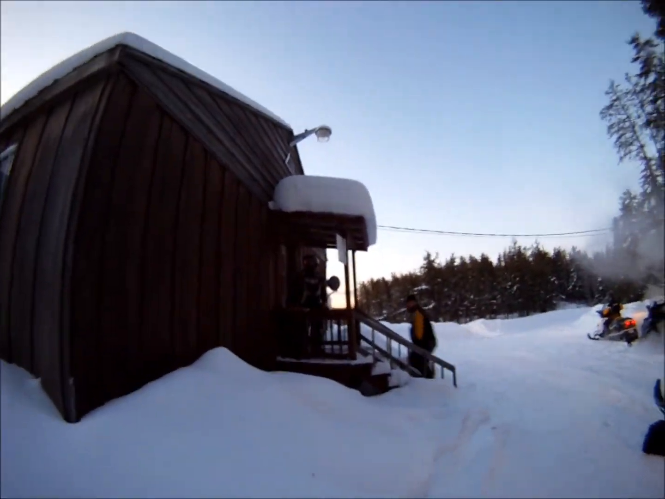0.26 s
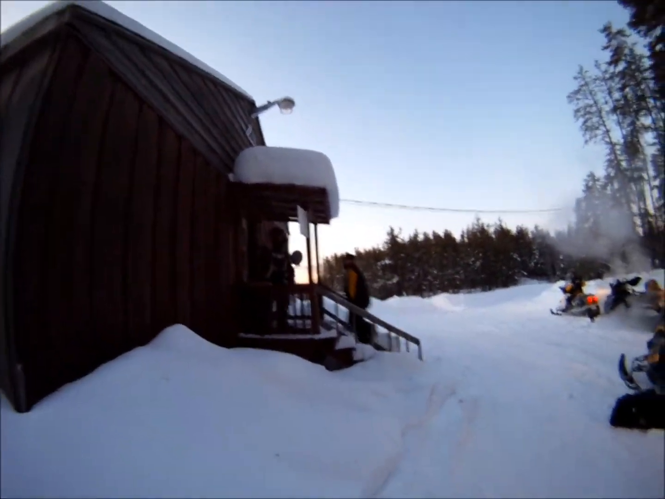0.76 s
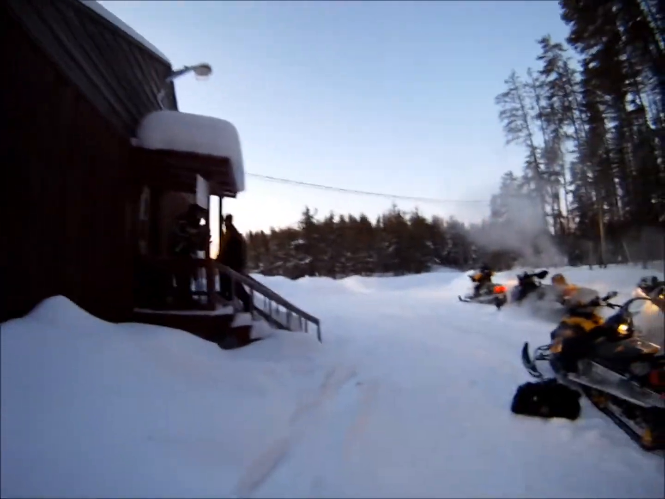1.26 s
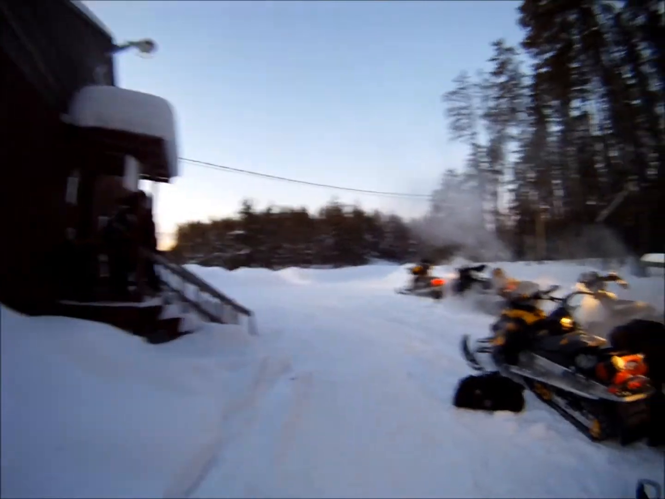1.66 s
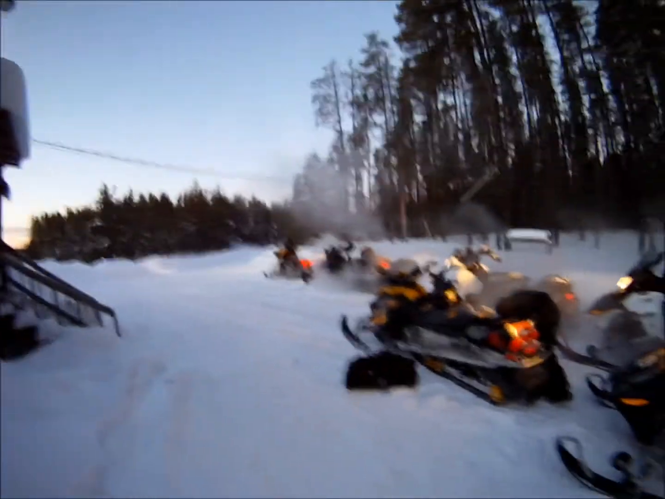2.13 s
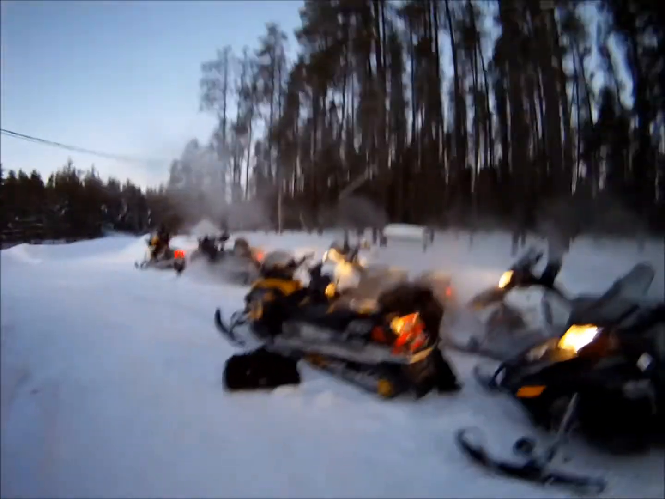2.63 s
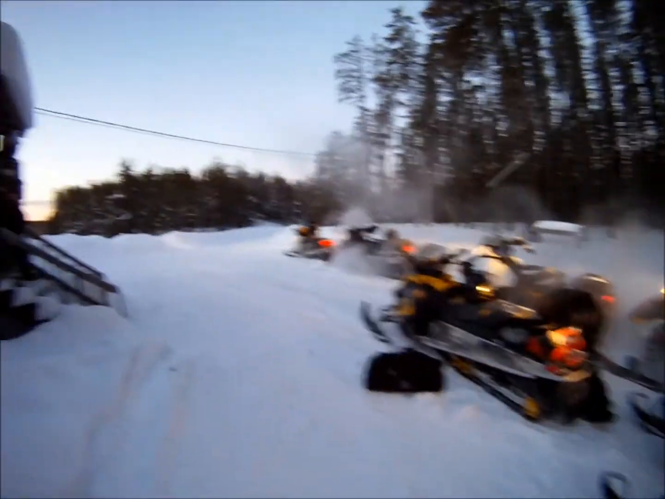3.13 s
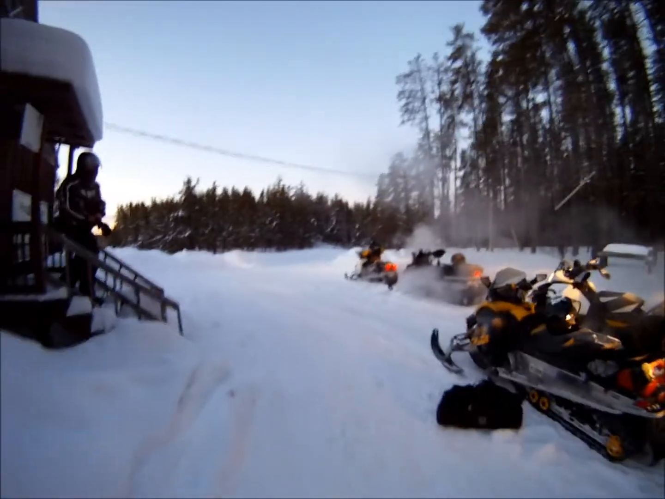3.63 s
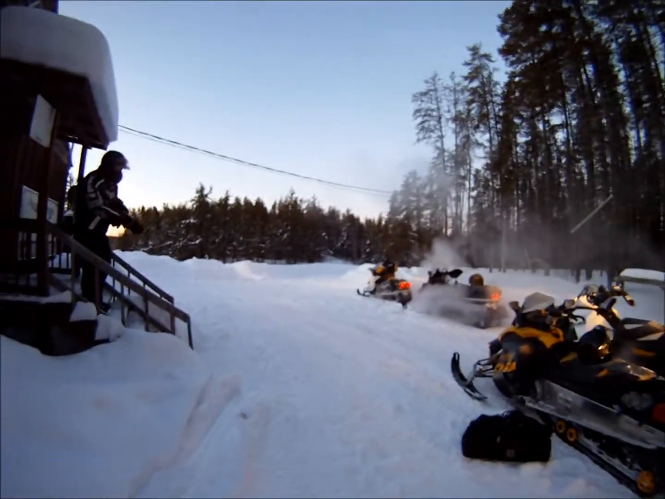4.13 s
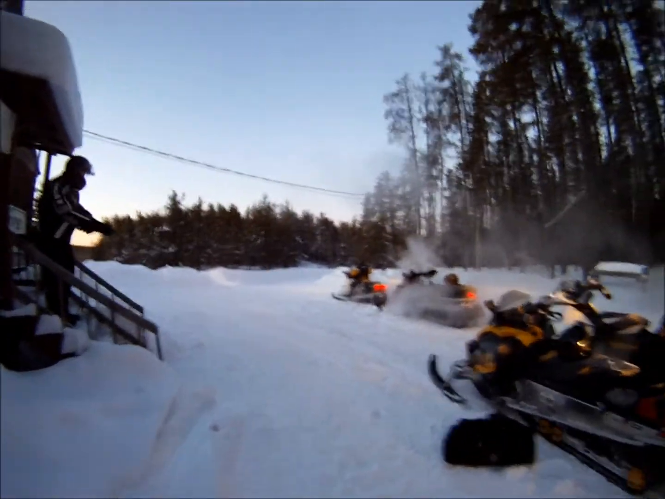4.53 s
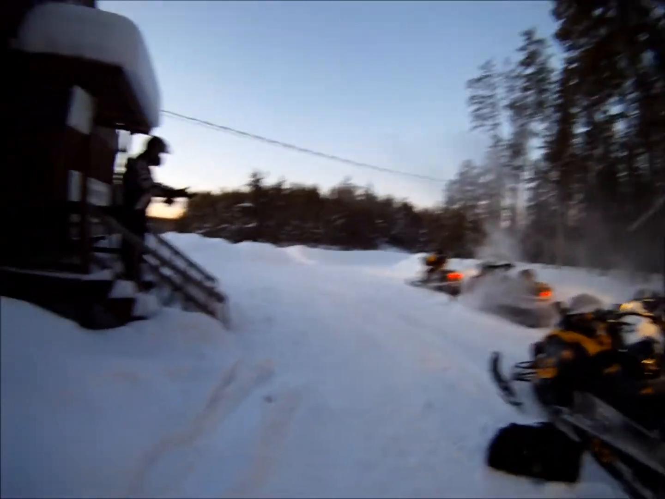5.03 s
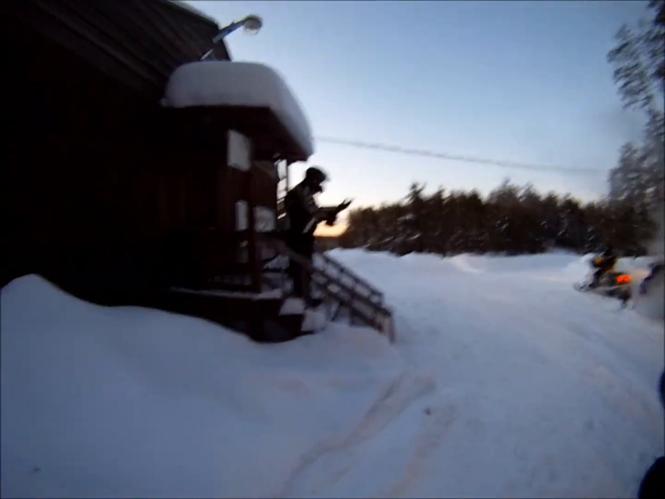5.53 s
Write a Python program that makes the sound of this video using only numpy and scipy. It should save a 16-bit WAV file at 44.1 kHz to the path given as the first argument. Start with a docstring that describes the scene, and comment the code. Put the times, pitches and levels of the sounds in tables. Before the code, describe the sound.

Close clicks and dull bumps from a handheld plastic camera case sit over the steady, fairly quiet rattle and hum of idling snowmobiles. A rough scrape with one very loud, sharp knock breaks in around two seconds and trails off in shorter rubs. The engines keep idling in the dry outdoor air, a far one gently opens its throttle, and a quick cluster of thuds and clicks comes at the end.

```python
"""Idling snowmobiles, handled camera

Several snowmobiles idle on open snow, heard from a camera in a plastic case carried past them.
Their exhausts beat against each other under a throbbing clatter; a far one creeps off.
Something scrapes over the case and knocks it once sharply; handling makes it click and thud."""
import sys
import numpy as np
from scipy import signal
from scipy.fft import rfft, irfft
from scipy.io import wavfile
from scipy.ndimage import uniform_filter1d

SR = 44100
rng = np.random.default_rng(int(sys.argv[2]) if len(sys.argv) > 2 else 0)


def store_pcm(level_fs):
    """Save levels as 16-bit WAV."""
    pcm = np.round(np.clip(level_fs, -1, 1) * 32767).astype(np.int16)
    wavfile.write(sys.argv[1], SR, np.atleast_2d(pcm).T)


N = 254898


def snowmobiles():
    """Idling exhausts beat against each other over their joint clatter."""
    # Each row: firing rate in Hz, exhaust level in dB, rattle in dB relative to the near engine's.
    other_idles = [(64.53, -47, -0.5), (73, -46, -2), (79.5, -47.5, -6.5)]
    exhausts, rattles = near_engine()
    for firing_hz, exhaust_db, rattle_db in other_idles:
        exhaust, metal = other_engine(firing_hz)
        exhausts = exhausts + undb(exhaust_db) * exhaust
        rattles = rattles + undb(rattle_db) * metal
    return exhausts + clatter(rattles)


def near_engine(waver_db=3.0, hunt=0.0083):
    """Twin with unequal cylinders: odd shaft multiples sound beside the firing rate."""
    # Each row: time in seconds, shaft rate in Hz.
    shaft_speed = [(0.0, 35.8), (0.26, 33.07), (0.45, 35.28), (1.0, 33.13), (1.33, 35.73), (1.59, 33.6),
                   (1.82, 34.83), (2.22, 33.2), (2.3, 34.4), (3.4, 34.5), (3.53, 33.3), (3.81, 34.8),
                   (5.68, 34.41), (5.78, 35.67)]
    # Each row: multiple of the shaft rate, exhaust level in dB.
    harmonics = [(1, -55), (2, -45.5), (3, -46), (4, -54.5), (5, -61), (6, -63), (7, -72)]
    turns = np.cumsum(curve(shaft_speed) * (1 + hunt * walk(14))) / SR
    exhaust = np.zeros(N)
    for multiple, db in harmonics:
        amplitude = np.sqrt(2) * undb(db + waver_db * walk(22))
        exhaust += amplitude * np.sin(2 * np.pi * (multiple * turns + rng.random()))
    return exhaust, rattle(2 * turns, decay_cycles=0.31, depth=1.1)


def other_engine(firing_hz, hunt=0.025, scatter_db=2.5):
    """Unsteady idle: uneven firings ring the silencer and rattle the metal."""
    # Each row: frequency in Hz, gain in dB.
    silencer = [(10, -9), (22, -20), (48, -7), (70, 0.5), (100, 2.5), (125, -11), (200, -14), (260, -22.5),
                (400, -39), (900, -46)]
    cycles = rng.random() + np.cumsum(firing_hz * (1 + hunt * walk(7))) / SR
    at = np.flatnonzero(np.diff(np.floor(cycles)))
    firings = impulses(at, undb(scatter_db * rng.standard_normal(N)[:len(at)]))
    exhaust = unit(colour(firings - firings.mean(), silencer))
    return exhaust, rattle(cycles, decay_cycles=0.27, depth=0.95)


def rattle(cycles, decay_cycles, depth):
    """Metal noise flares at each firing and fades within the cycle."""
    flare = 1 + depth * np.exp(-(cycles % 1) / decay_cycles)
    return unit(flare * rng.standard_normal(N))


def clatter(rattles, base_db=-45.5, throb_hz=14.0, throb_db=1.57, flutter_db=0.52):
    """Rattle rings block, clutch and covers, throbbing as the engine rocks on its mounts."""
    # Each row: frequency in Hz, gain in dB.
    block_and_clutch = [(250, -8), (420, -13), (560, -15.5), (720, -9), (1150, -3), (1340, -9.5),
                        (1500, -1.5), (1800, -0.5), (2400, -3), (2950, -12.5), (3400, -10), (4500, -17.5),
                        (5200, -13.5), (10000, -20.5), (15000, -17.5)]
    # Each row: frequency in Hz, width in Hz, lift in dB.
    cover_modes = [(1937, 31, 6.5), (2200, 28.5, 9), (2660, 46, 6.5), (3115, 63, 7.5), (3586, 60, 5),
                   (6530, 170, 6.5), (8470, 136, 9.5), (9760, 85, 8.5), (14200, 60, -3)]
    # The camera turns past the machines. Each row: time in seconds, half width in seconds, lift in dB.
    swells = [(1.25, .3, 1.2), (2.55, 0.35, 4), (5.6, 0.23, 3.5)]
    rocking_hz = throb_hz * (1 + 0.05 * walk(4))
    rocking = np.sin(2 * np.pi * np.cumsum(rocking_hz) / SR)
    drive = rattles * undb(throb_db * rocking + flutter_db * walk(25.054))
    ringing = unit(resonate(colour(drive, block_and_clutch), cover_modes))
    time_s = np.arange(N) / SR
    swell_db = sum(db * np.exp(-((time_s - at_s) / width_s) ** 2) for at_s, width_s, db in swells)
    return ringing * undb(base_db + swell_db)


def scrape(slips_per_s=2500, spread_db=1.0, grip_db=-0.5, thin_hz=1500, firm_db=-24):
    """Dense tiny slips and a few hard snags ring the shell as something drags over it."""
    # Each row: frequency in Hz, gain in dB.
    shell = [(60, -26), (200, -28), (400, -13), (600, -21), (720, -7.5), (850, -12), (1150, 1.5),
             (1330, -6.5), (1650, 4), (2050, -3), (2500, -12), (4000, -24.5), (15000, -21)]
    # Each row: frequency in Hz, width in Hz, lift in dB.
    shell_modes = [(1165, 27, 4.5), (1356, 22, 9.5), (1835, 42, 4), (2843, 126, 10.5), (3620, 134, 9.5),
                   (4370, 190, 7.5), (7500, 140, 5), (8330, 120, 8), (10750, 350, 7), (13300, 180, 10)]
    # Each row: time in seconds, level in dB, crack offset in dB.
    snags = [(2.0589, -2.5, -13), (2.0678, -5.5, -17), (2.0695, -6, -17), (2.1029, -7, -15),
             (2.1296, -17, -9), (2.1307, -4, -15), (2.1345, -6, -17), (2.357, -32, -10), (2.4788, -16, -11)]
    slipping = rng.random(N) < slips_per_s / SR
    slips = slipping * undb(spread_db * rng.standard_normal(N)) * rng.choice([-1, 1], N)
    slips *= undb(grip_db * walk(150))  # grip comes and goes
    full = unit(resonate(colour(slips, shell), shell_modes))
    thin = unit(signal.sosfiltfilt(signal.butter(1, thin_hz, "high", fs=SR, output="sos"), full))
    level_db = stroke_level_db()
    firmness = np.minimum(undb((level_db - firm_db) / 2), 1)  # a light touch stirs low modes less
    rasp = (firmness * full + (1 - firmness) * thin) * undb(level_db)
    at_s, snag_db, crack_db = np.transpose(snags)
    snag_rings = resonate(taps(np.c_[at_s, snag_db], shell), shell_modes)
    return rasp + snag_rings + cracks(at_s, snag_db + crack_db)


def stroke_level_db(press_db_per_s=42):
    """Each scraping stroke bites, presses harder while held, then dies away."""
    # Each row: start in seconds, 60 dB rise time in seconds, hold in seconds,
    # level at the start in dB, 60 dB release time in seconds.
    strokes = [(1.96, .08, .173, -25.5, 0.037), (2.18, .02, 0.025, -37.5, 0.32),
               (2.27, .16, .012, -27, 0.17), (2.339, .08, 0.019, -37, 0.12), (2.447, .02, .004, -30.5, .12),
               (2.479, .02, .008, -24.5, .13), (2.52, .1, .02, -36, .7), (2.984, .06, .01, -42, 0.16)]
    power = 1e-12
    for start_s, rise_s, hold_s, db, t60_s in strokes:
        age_s = np.arange(N) / SR - start_s
        held_db = db + press_db_per_s * np.clip(age_s, 0, hold_s)
        fade_db = 60 * (np.maximum(-age_s, 0) / rise_s + np.maximum(age_s - hold_s, 0) / t60_s)
        power = power + undb(held_db - fade_db) ** 2
    return 10 * np.log10(power)


def knock(crack_db=1.5):
    """A sharp knock on the case, ringing near 1.3 kHz with a harsh, clipped edge."""
    # Each row: time in seconds, level in dB.
    chatter = [(2.0402, -1), (2.04056, 2), (2.0409, -3)]
    # Each row: frequency in Hz, gain in dB.
    overloaded_knock = [(80, -13), (400, 5), (750, -9), (1250, 5), (1800, 5.5), (3000, -24), (4700, -5.5),
                        (6500, -11.5), (10000, -21), (15000, -18.5)]
    at_s, db = np.transpose(chatter)
    direction = (-1) ** np.arange(len(at_s))  # in, back, in again within a millisecond
    pushes = impulses(at_s * SR, direction * undb(db))
    return colour(pushes, overloaded_knock) + cracks(at_s, db + crack_db)


def clicks(width_hz=220, lift_db=5, snap_db=-17):
    """Each joint of the case snaps and rings briefly at its own pitch."""
    # Each row: time in seconds, level in dB, ring frequency in Hz.
    snaps = [(.031, -24.5, 1600), (0.952, -24, 1640), (1.131, -18, 1650), (1.1414, -18.5, 1120),
             (1.239, -16.5, 1450), (1.4343, -21.5, 1270), (2.9629, -30, 1710), (2.98, -27.5, 1690),
             (5.5807, -31, 1900), (5.6926, -22.5, 2250)]
    # Each row: frequency in Hz, gain in dB.
    joint = [(60, -22), (400, -20.5), (700, 3), (850, 1), (1150, 9), (1350, 3.5), (1620, 11.5), (2100, 5),
             (2800, -17), (5000, -19), (8500, -50), (10400, -4.5), (15000, -22)]
    rings = sum(resonate(taps([(at_s, db)], joint), [(hz, width_hz, lift_db)]) for at_s, db, hz in snaps)
    at_s, db, _ = np.transpose(snaps)
    return rings + cracks(at_s, db + snap_db, highpass_hz=9000)


def thuds(snap_db=-10):
    """Soft contacts move the whole case; each starts with a faint snap."""
    # Each row: time in seconds, level in dB.
    contacts = [(0.059, -32.5), (.294, -30), (0.953, -34.5), (1.056, -32), (1.142, -20.5), (1.436, -30.5),
                (1.826, -29.5), (1.923, -30.5), (1.956, -21), (2.133, -35), (2.357, -25.5), (2.891, -31),
                (3.2045, -29.5), (3.347, -32), (4.487, -34), (5.513, -18.5), (5.5777, -16.5),
                (5.6933, -14.5)]
    # Each row: frequency in Hz, gain in dB.
    case_body = [(30, -35), (130, 3.5), (220, 3.5), (400, 1), (560, -3), (730, 4.5), (860, -17), (1000, -4),
                 (1250, -11.5), (1800, -10), (3500, -22.5), (15000, -30)]
    at_s, db = np.transpose(contacts)
    return taps(contacts, case_body) + cracks(at_s, db + snap_db, highpass_hz=8000)


def cracks(at_s, db, highpass_hz=3000):
    """Bright first instant of a contact, before the case rings."""
    highpass = signal.butter(2, highpass_hz, "high", fs=SR, output="sos")
    return signal.sosfilt(highpass, impulses(at_s * SR, undb(db)))


def jolts(t60_s=0.076):
    """The jolted camera swings briefly in the hand."""
    # Each row: start in seconds, frequency in Hz, initial level in dB.
    swings = [(1.154, 32, -30), (1.958, 62, -22), (2.137, 53, -23), (5.515, 114, -34), (5.694, 103, -25)]
    motion = np.zeros(N)
    for start_s, hz, db in swings:
        age_s = np.maximum(np.arange(N) / SR - start_s, 0)
        motion += undb(db - 60 * age_s / t60_s) * np.sin(2 * np.pi * hz * age_s)
    return motion


def scuffs(centre_hz=760, width_hz=260, rise_s=0.0082):
    """Light rubs stir one low mode of the case."""
    # Each row: start in seconds, length in seconds, level in dB.
    rubs = [(0.042, 0.14, -49), (4.484, 0.051, -44.5)]
    mode = signal.iirpeak(centre_hz, centre_hz / width_hz, fs=SR)
    friction = unit(signal.lfilter(*mode, rng.standard_normal(N)))
    envelope = sum(curve([(start_s, 0), (start_s + rise_s, undb(db)), (start_s + length_s, 0)])
                   for start_s, length_s, db in rubs)
    return friction * envelope


def creeping_engine(start_s=4.1, attack_s=0.2, from_hz=180, to_hz=215, spinup_s=0.73):
    """A far machine opens its throttle lightly; only its rising exhaust tone carries."""
    level_db, waver_db, hunt = -55.5, 2.5, 0.015
    age_s = np.maximum(np.arange(N) / SR - start_s, 0)
    tone_hz = to_hz + (from_hz - to_hz) * np.exp(-age_s / spinup_s)
    cycles = np.cumsum(tone_hz * (1 + hunt * walk(30.17))) / SR
    throttle = np.minimum(age_s / attack_s, 1)
    return unit(np.sin(2 * np.pi * cycles)) * throttle * undb(level_db + waver_db * walk(33))


def air(level_db=-53, gust_db=3):
    """Air moving past the carried microphone makes a faint gusty rumble."""
    # Each row: frequency in Hz, gain in dB.
    rumble_spectrum = [(4, -36), (10, 3), (22, 0), (38, 4), (55, -7), (120, -39), (400, -68)]
    gusts = undb(gust_db * walk(5))
    return unit(colour(rng.standard_normal(N), rumble_spectrum) * gusts) * undb(level_db)


def undb(db):
    """Decibels to gain."""
    return 10 ** (np.asarray(db) / 20)


def unit(x):
    """Scale to rms 1."""
    return x / np.sqrt(np.mean(x ** 2))


def curve(rows):
    """Straight lines through (seconds, value) rows."""
    at_s, value = np.transpose(rows)
    return np.interp(np.arange(N) / SR, at_s, value)


def walk(rate_hz):
    """Random steps at rate_hz, smoothed twice, rms 1."""
    step = int(SR / rate_hz)
    held = np.repeat(rng.standard_normal(N // step + 1), step)
    return unit(uniform_filter1d(uniform_filter1d(held, step), step)[:N])


def response(spectrum, size=8192):
    """Minimum-phase impulse response of a (Hz, dB) spectrum, peak 1."""
    hz, db = np.transpose(spectrum)
    bins_hz = np.maximum(np.fft.rfftfreq(size, 1 / SR), 1)
    gain = undb(np.interp(np.log(bins_hz), np.log(hz), db))
    cepstrum = irfft(np.log(gain))
    cepstrum[1:size // 2] *= 2
    cepstrum[size // 2 + 1:] = 0
    ring = irfft(np.exp(rfft(cepstrum)))
    return ring / np.abs(ring).max()


def colour(x, spectrum):
    """Filter x by a (Hz, dB) spectrum."""
    return signal.fftconvolve(x, response(spectrum))[:N]


def resonate(x, modes):
    """Lift or cut x around each (Hz, width in Hz, dB) mode."""
    for hz, width_hz, db in modes:
        b, a = signal.iirpeak(hz, hz / width_hz, fs=SR)
        x = x + (undb(db) - 1) * signal.lfilter(b, a, x)
    return x


def impulses(at, sizes):
    """Pushes of given sizes at given samples."""
    return np.bincount(np.asarray(at, int), sizes, N)[:N]


def taps(contacts, spectrum):
    """Each (seconds, dB) contact rings a body briefly."""
    at_s, db = np.transpose(contacts)
    return colour(impulses(at_s * SR, undb(db)), spectrum)


def scene():
    """Engines outside, handling noise on the case; snow gives no echo."""
    handling = scrape() + knock() + clicks() + thuds() + jolts() + scuffs()
    return (snowmobiles() + creeping_engine() + handling + air())[None]


def record(dry, top_hz=15300):
    """The closed case colours the treble; peaks clip at full scale and the top is cut."""
    # Each row: frequency in Hz, gain in dB.
    closed_case = [(2800, 0.5), (3200, -1), (3600, 2), (3950, -0.5), (5400, -2), (6000, -13.5), (6600, -5),
                   (8500, -2.5), (10300, 7), (11000, -9), (11600, -11), (12500, -23), (13800, 6),
                   (15200, -6)]
    ring = response(closed_case)
    inside = signal.fftconvolve(dry, ring[None] / abs(ring.sum()), axes=1)[:, :N]
    lowpass = signal.ellip(10, 0.2, 70, top_hz, fs=SR, output="sos")
    return signal.sosfilt(lowpass, np.clip(inside, -1, 1))


dry = scene()
out = record(dry)
store_pcm(out)
```